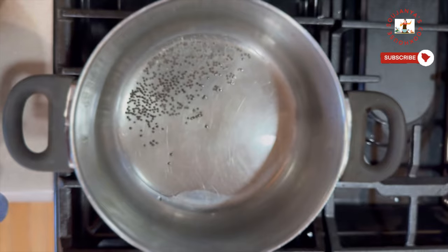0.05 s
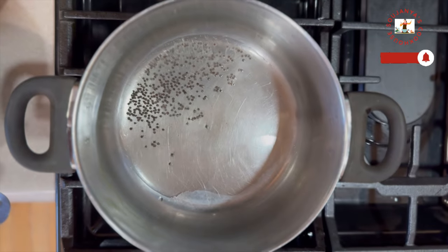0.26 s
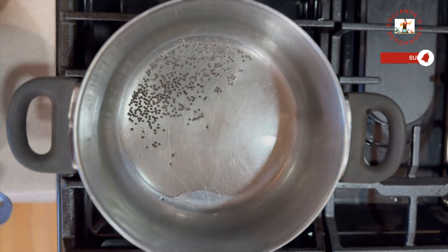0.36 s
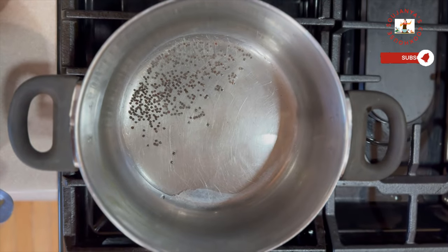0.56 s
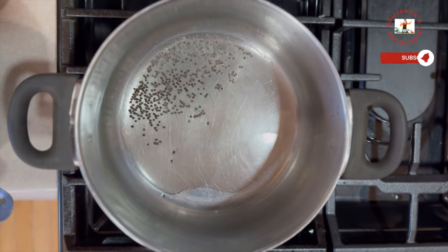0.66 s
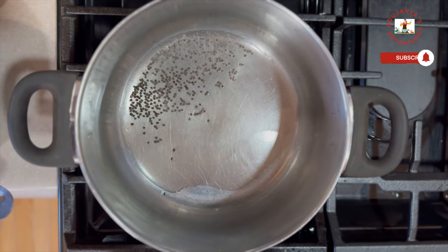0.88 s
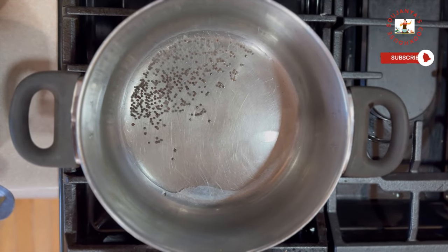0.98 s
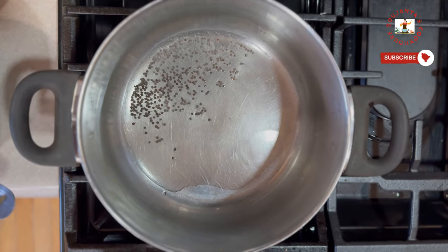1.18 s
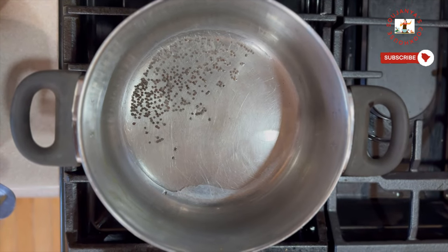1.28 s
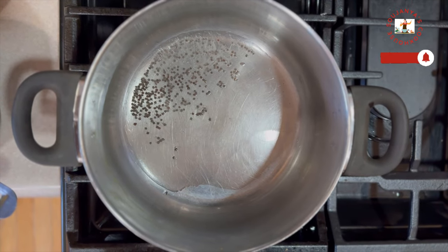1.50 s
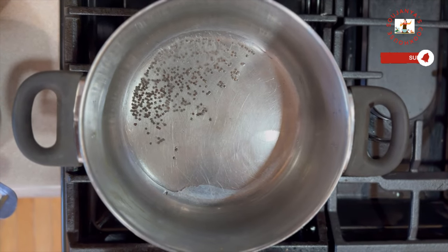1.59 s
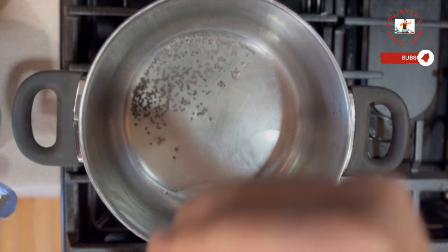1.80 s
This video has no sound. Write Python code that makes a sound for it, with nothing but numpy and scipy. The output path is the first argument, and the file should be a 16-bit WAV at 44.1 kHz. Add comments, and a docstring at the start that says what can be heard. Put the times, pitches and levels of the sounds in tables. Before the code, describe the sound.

Mustard seeds pop in hot oil in a steel pot, close and dry. Faint sizzle and flame hiss open; small pops arrive around 0.2 s, then the loudest sharp, metallic cluster at 0.43-0.46 s. Lighter crackles continue, with another clear pop at 0.7 s. A brief sizzle swell comes near 1.0 s, tiny ticks at 1.3 s, then quiet hiss with a slight bright rise around 1.8 s.

```python
"""Mustard seeds popping in hot oil

Mustard seeds in a thin film of hot oil in a steel pot on a gas ring, heard from above in a kitchen.
Seeds pop as noise bursts that ring the pot and snap brightly; random clicks make flurries of crackles.
Noise ticks and puffs are the spitting, sizzling oil; shaped noise is the flame's hiss and a low rumble.
Left and right are out of phase in parts of the treble."""
import sys
import numpy as np
from scipy import signal
from scipy.fft import rfft, irfft, next_fast_len
from scipy.io import wavfile
from scipy.ndimage import uniform_filter1d

SR = 44100
rng = np.random.default_rng(int(sys.argv[2]) if len(sys.argv) > 2 else 0)


def dump_mix(stems):
    """Bounce the given channels to the path in sys.argv[1] as a 16-bit WAV at rate SR."""
    frames = np.atleast_2d(stems).T  # one column per channel
    limited = np.clip(frames, -1, 1)  # hard clip at full scale
    pcm = np.round(limited * 32767).astype(np.int16)
    wavfile.write(sys.argv[1], SR, pcm)


N = 81585  # length in samples
TIME_S = np.arange(N) / SR
BIN_HZ = np.arange(N // 2 + 1) * SR / N  # frequency of each step of the spectrum


def amp(db):
    """Turn decibels into a gain."""
    return 10 ** (np.asarray(db) / 20)


def unit(x):
    """Scale to an average (rms) level of 1."""
    return x / np.sqrt(np.mean(x ** 2) + 1e-20)


def in_time(rows):
    """Draw straight lines between the rows of a time table, giving each column at every sample."""
    seconds, *columns = np.transpose(rows)
    return [np.interp(TIME_S, seconds, column) for column in columns]


def colour(x, spectrum):
    """Shape white noise by a (Hz, dB) spectrum, keeping its rms about the same."""
    hz, db = np.transpose(spectrum)
    bins_hz = np.arange(len(x) // 2 + 1) * SR / len(x)
    log_hz = np.log(np.maximum(bins_hz, 1))
    gain = amp(np.interp(log_hz, np.log(hz), db, left=-60))
    return irfft(rfft(x) * unit(gain), len(x))


def ring(x, hz, t60):
    """One mode of the pot: a click sets off a sine that dies by 60 dB in t60 seconds, at most 0.055."""
    decay = amp(-60 / (min(t60, .055) * SR))
    turn = 2 * np.pi * hz / SR
    # the tiny offset keeps the filter away from very slow, near-zero numbers
    return signal.lfilter([0, np.sin(turn)], [1, -2 * decay * np.cos(turn), decay ** 2], x + 1e-18)


def clicks(per_s, spread_db):
    """Clicks at random moments, uneven in size and random in sign."""
    sizes = amp(spread_db * np.minimum(rng.exponential(1, N), 4))
    signs = rng.choice([-1, 1], N)
    return sizes * signs * (rng.random(N) < per_s / SR)


# Ways the steel pot rings. Each row: pitch in Hz, relative level in dB,
# time to die by 60 dB in seconds (before the limit in ring, and any stretch in flurries).
POT_MODES = [(264, -1.5, 0.04), (410, -1, 0.063), (483, 0, 0.043), (620, 1.5, 0.035), (814, 0.5, 0.023),
             (1005, 2.5, 0.028), (1110, 3, 0.025), (1219, 2, 0.026), (1436, 0, 0.019), (1600, 1, 0.019),
             (2000, -3, 0.011), (2280, 2.5, 0.028), (2502, 4.5, 0.021), (2970, 3, 0.03), (3260, 2, 0.035),
             (3800, -3, 0.027), (4100, 2.5, 0.024), (5700, -1, .012)]
# Colour of the bright snap. Each row: frequency in Hz, relative level in dB per Hz.
SNAP_COLOUR = [(1500, 7.5), (3000, 12), (5000, 13), (6500, 10), (9000, 9), (12000, 6), (15500, 10.5)]
# Single pops. Each row: time in seconds, relative level of the rap in dB, pitch of the rap in Hz,
# bright snap in dB relative to the rap's column, highest treble in dB relative to the same,
# time for the burst to die by 60 dB in seconds, fall of the modes away from the pitch in dB per octave.
POPS = [(0.181, -36, 3170, 3, -19, 0.031, 33), (0.201, -22, 1280, -21, -18, 0.019, 23),
        (0.2025, -24, 3800, -14, -25, 0.0094, 49), (0.2132, -25, 2970, -16, -25, 0.0054, 38),
        (0.2135, -19, 820, -12, -39, 0.0082, 22), (0.2604, -32.5, 3740, 9, -24, 0.0075, 10),
        (0.276, -32, 2270, -11, -20, 0.0074, 11), (0.313, -31.5, 3060, -18, -17, 0.0049, 1.5),
        (0.3771, -30, 5700, 4, -26, 0.0097, 41), (0.3769, -25, 3100, -12, -26, 0.0048, 3),
        (0.378, -31.5, 1300, -20, -26, 0.0079, 41), (0.432, -6.5, 1005, -14, -18, 0.018, 12.5),
        (0.437, -11, 1200, -2, -28, 0.01, 17), (0.441, -14, 325, -27, -22, 0.0044, 8),
        (0.449, -14.5, 680, -30, -23, 0.021, 14.5), (0.455, -19.5, 950, -9, -13, 0.023, 13),
        (0.508, -29, 700, -18, -18, 0.01, 14), (0.522, -27, 1580, -23, -15, 0.0075, 9),
        (0.546, -27, 1010, 0.5, -12, 0.017, 14), (0.553, -27.5, 1060, -25, -20, 0.013, 3),
        (0.565, -27, 1410, -12, -20, 0.0096, 17), (0.58, -24, 1110, -23, -8, 0.011, 9),
        (0.673, -32, 1070, 1, -23, 0.014, 18), (0.696, -32.5, 1240, 14, -12, 0.0073, 11),
        (0.701, -13.5, 1020, -7, -20, 0.0075, 23), (0.707, -24, 620, 13.5, -23, 0.0051, 5.5),
        (0.729, -20.5, 1100, 5, -26, 0.0075, 18), (0.735, -26, 1160, -13, -21, 0.0069, 29),
        (0.75, -31.5, 1070, 5, -20, 0.0075, 35), (0.761, -26.5, 1130, 3, -21, 0.0095, 16),
        (0.784, -28, 1200, -3.5, -28, 0.033, 9), (0.807, -32.5, 1060, -6, -17, 0.014, 7),
        (0.879, -32, 477, -5, -15, 0.0094, 13), (0.904, -31.5, 500, -12, -7, 0.016, 6),
        (0.955, -38, 3100, -24, -16, 0.0073, 18), (0.968, -26.5, 900, -17, -23, 0.0088, 10),
        (0.983, -27, 786, -18, -12, 0.0034, 21), (1.31, -33, 2970, -14, 1, 0.009, 28),
        (1.3228, -38, 2970, 4, -10, 0.0091, 33), (1.326, -34, 410, -20, -8, 0.021, 13.5),
        (1.328, -31.5, 2970, -8, -10, 0.0061, 38)]
RAP_DB, SNAP_DB = -10, 1  # added to the levels of all raps, and of all snaps and highest treble
ATTACK_S = .0008  # how quickly a burst swells
LEAD_S, SNAP_LAG_S = .0018, .0018  # the rap starts before the listed time; the snap waits after that
FIRST_BLOW = 2.34  # height of the opening click over the burst's noise


def pops():
    """Each pop is a short dying burst: it rings the pot modes near its pitch and snaps in the treble."""
    out = np.zeros(N + SR)
    t = np.arange(SR // 8) / SR
    for start_s, rap_db, pitch_hz, snap_db, top_db, t60, fall_db in POPS:
        shape = (1 - np.exp(-t / ATTACK_S)) * amp(-60 * t / t60)
        burst, spit = rng.standard_normal((2, len(t))) * shape
        burst[int(ATTACK_S * SR)] += FIRST_BLOW * rng.choice([-1, 1])

        rap = np.zeros(len(t))
        for k, (hz, mode_db, mode_t60) in enumerate(POT_MODES):
            share = amp(mode_db - fall_db * abs(np.log2(hz / pitch_hz)))
            # neighbouring modes get opposite signs; longer rings hold more energy
            rap += share * (-1) ** k * np.sqrt(mode_t60) * unit(ring(burst, hz, mode_t60))
        loudest = np.sqrt(uniform_filter1d(rap ** 2, size=88).max())  # rms of the loudest 2 ms
        i = int((start_s - LEAD_S) * SR)
        out[i:i + len(t)] += amp(rap_db + RAP_DB) * rap / loudest

        snap = amp(rap_db + snap_db + SNAP_DB) * colour(spit, SNAP_COLOUR)
        top = amp(rap_db + top_db + SNAP_DB) * colour(spit, [(9200, -8), (15800, 0)])
        i += int(SNAP_LAG_S * SR)
        out[i:i + len(t)] += snap + top
    return out[:N]


# How the small crackles come and go. Each row: time in seconds, level of the ringing pot in dB,
# level of the bright snapping in dB, pitch that rings most in Hz.
FLURRY_CURVE = [(0, -53.5, -48, 930), (.15, -57, -50.5, 980), (.185, -45, -44, 3240),
                (.21, -48, -35.5, 1110), (.235, -47, -47.5, 685), (.36, -55.5, -47, 950),
                (.425, -43, -43.5, 1110), (.44, -30.5, -25, 1010), (.465, -39, -38.5, 790),
                (.485, -39, -47, 645), (.5, -48.5, -43, 705), (.535, -43.5, -40.5, 1310),
                (.55, -42.5, -38.5, 1340), (.585, -42, -37.5, 1300), (.61, -50, -46.5, 1100),
                (.665, -50, -43.5, 1080), (.695, -41, -35.5, 1120), (.74, -42, -36.5, 1100),
                (.775, -51.5, -39, 1120), (.797, -51.5, -40.5, 1120), (.83, -49, -45.5, 1120),
                (.87, -56.5, -49.5, 710), (.95, -48, -45, 750), (.995, -48.5, -45, 600),
                (1.03, -55.5, -56, 600), (1.3, -64, -51.5, 1030), (1.85, -62, -59, 1040)]
CRACKLES_PER_S, CRACKLE_SPREAD_DB = 2500, 3.5
FALL_DB_PER_OCT, FALL_MOST_DB = 15, 9.5  # how much weaker modes get away from the pitch
RING_STRETCH = 1.64  # crackles ring the pot this many times longer than its table says


def flurries():
    """Dense small crackles ring the pot, mostly near one wandering pitch, and snap in the treble."""
    ring_db, snap_db, pitch_hz = in_time(FLURRY_CURVE)
    grains = clicks(CRACKLES_PER_S, CRACKLE_SPREAD_DB)
    dealt = rng.integers(0, 3, N)  # each crackle rings only one third of the modes
    rings, power = np.zeros(N), np.zeros(N)
    for k, (hz, mode_db, t60) in enumerate(POT_MODES):
        fall_db = np.minimum(FALL_DB_PER_OCT * abs(np.log2(hz / pitch_hz)), FALL_MOST_DB)
        share = amp(mode_db - fall_db)
        rings += share * unit(ring(grains * (dealt == k % 3), hz, RING_STRETCH * t60))
        power += share ** 2
    # steady noise fills the gaps between the snapping clicks
    filler = 4.2 * rng.standard_normal(N) * grains.std()
    snaps = colour(grains + filler, SNAP_COLOUR)
    return amp(ring_db) * rings / np.sqrt(power) + amp(snap_db) * unit(snaps)


# Bright ticks of spitting oil. Each row: start in seconds, relative level in dB.
TICKS = [(0.4796, -35), (0.5432, -29.5), (0.578, -38), (0.6965, -38), (0.892, -42), (0.9255, -48),
         (0.9557, -39), (1.0375, -41), (1.3082, -34), (1.32, -34), (1.324, -41), (1.3273, -34),
         (1.4222, -49), (1.529, -43)]
# Colour of the ticks. Each row: frequency in Hz, relative level in dB per Hz.
TICK_COLOUR = [(2500, -5), (3100, -15), (5000, -5.5), (8000, -6.5), (12000, 0.5), (15800, -2)]
TICK_T60_S, TICK_DB = .019, 7.5  # time to die by 60 dB; added to every tick's level


def ticks():
    """Each tick of spitting oil is noise that starts sharply and dies very fast."""
    out = np.zeros(N + SR)
    t = np.arange(SR // 50) / SR
    for start_s, db in TICKS:
        i = int(start_s * SR)
        out[i:i + len(t)] += amp(db + TICK_DB - 60 * t / TICK_T60_S) * rng.standard_normal(len(t))
    return colour(out[:N], TICK_COLOUR)


# How loud the oil sizzles. Each row: time in seconds, level in dB.
SIZZLE_CURVE = [(0, -41), (.3, -50), (.55, -42), (.75, -43), (.95, -45), (1.01, -36), (1.08, -40),
                (1.25, -44), (1.45, -47), (1.58, -46), (1.7, -47), (1.8, -37), (1.85, -42)]
BUBBLES_PER_S, BUBBLE_SPREAD_DB = 600, 3.2
PUFF_S = .0059  # time for a puff to sink to about a third


def sizzle():
    """Tiny bubbles burst in the oil: overlapping puffs of very bright noise."""
    fade = np.exp(-1 / (PUFF_S * SR))
    bursts = np.abs(clicks(BUBBLES_PER_S, BUBBLE_SPREAD_DB))
    puffs = signal.lfilter([1], [1, -fade], bursts)
    bright = colour(puffs * rng.standard_normal(N), [(9450, -14), (13000, -6), (14500, 0), (15800, 1)])
    level_db, = in_time(SIZZLE_CURVE)
    return amp(level_db) * unit(bright)


# Colour of the hiss of flame and oil. Each row: frequency in Hz, relative level in dB per Hz.
HISS_COLOUR = [(100, 10), (200, -49), (270, -6), (325, 7), (410, -1), (560, 8.5), (820, -4.5), (1650, 3.5),
               (2200, -7), (3100, 2.5), (3800, -4.5), (5500, -6), (7600, 7), (9500, -1.5), (10500, 6),
               (12300, -15.5), (14500, 11.5), (15800, -2)]
HISS_DB = -46
PATCH_EDGES_HZ = [1000, 2000, 3500, 5500, 7500, 9500, 11500, 13300]  # where the bands meet
PATCHY_DB, PATCH_S = 1.5, .038  # typical swell of a band; time between its random levels


def hiss():
    """Coloured noise of flame and oil whose bands swell and sink in patches, each on its own."""
    noise = rfft(colour(rng.standard_normal(N), HISS_COLOUR))
    band_of_bin = np.searchsorted(PATCH_EDGES_HZ, BIN_HZ)
    knots_s = np.arange(0, N / SR + PATCH_S, PATCH_S)
    out = np.zeros(N)
    for k in range(len(PATCH_EDGES_HZ) + 1):
        swell = np.interp(TIME_S, knots_s, rng.standard_normal(len(knots_s)))
        out += amp(PATCHY_DB * swell) * irfft(noise * (band_of_bin == k), N)
    return amp(HISS_DB) * out


# How the low rumble moves. Each row: time in seconds, level of the deep band in dB,
# level of the upper band in dB.
RUMBLE_CURVE = [(0.0, -69, -68), (0.174, -60.5, -65), (0.2, -52.5, -72), (0.22, -40.5, -60),
                (0.25, -46, -72.5), (0.318, -57, -58), (0.354, -51, -92), (0.412, -55, -60),
                (0.432, -60, -53), (0.45, -46, -35), (0.504, -61, -67), (0.56, -65, -51.5),
                (0.61, -58, -50), (0.664, -66, -92), (0.708, -51, -46.5), (0.788, -60, -102),
                (0.802, -63, -73), (0.978, -53, -59), (0.998, -73, -52), (1.04, -56, -80),
                (1.112, -67, -67), (1.2, -59.5, -74.5), (1.23, -69, -65.5), (1.35, -53, -71),
                (1.488, -70.5, -76), (1.596, -62, -66.5), (1.622, -70, -58), (1.66, -88, -61),
                (1.69, -68, -57.5), (1.73, -63, -70), (1.85, -65, -70)]
RUMBLE_BANDS_HZ = [(40, 77.5), (125, 185)]
RUMBLE_EVENNESS = .89  # 0 leaves the noise lumpy, 1 makes each band quite even


def rumble():
    """Low noise in two bands, its own lumps partly evened out, following a level curve for each."""
    out = np.zeros(N)
    for level_db, band_hz in zip(in_time(RUMBLE_CURVE), RUMBLE_BANDS_HZ):
        band_filter = signal.butter(2, band_hz, "band", fs=SR, output="sos")
        # one extra second lets the filter settle
        band = signal.sosfilt(band_filter, rng.standard_normal(N + SR))[SR:]
        lumps = np.abs(signal.hilbert(band, next_fast_len(N)))[:N] + 1e-9
        out += amp(level_db) * unit(band / lumps ** RUMBLE_EVENNESS)
    return out


def stove():
    """All the sources together."""
    return pops() + flurries() + ticks() + sizzle() + hiss() + rumble()


# How left and right differ across frequency. Each row: frequency in Hz,
# likeness of left and right from 0 to 1, lead of the right in radians, level of left over right in dB.
STEREO = [(50, .94, 0, 0), (300, .94, -.1, -.5), (500, .8, -.4, -.5), (780, .45, -.8, .5),
          (1100, .9, -.15, 2), (2000, .93, 0, 1), (2600, .3, -.8, .5), (3600, .3, 1.2, 1),
          (4500, .65, 2.6, .3), (4850, .99, 3.1, 0), (5250, .99, 3.15, 0), (5450, .4, 1.2, 0),
          (6050, .98, .25, 0), (7000, .88, 1.2, 0), (9700, .82, 2.3, 0), (10600, .999, 3.12, 0),
          (12950, .999, 3.16, 0), (13400, .92, 3.7, 0), (16000, .9, 4.7, 0)]
CUTOFF_HZ = 15850


def scene():
    """Direct sound reaches both sides alike; scattered sound, with fresh random detail, is opposed."""
    direct, scattered = rfft([stove(), stove()])
    hz, likeness, _, _ = np.transpose(STEREO)
    alike = np.interp(BIN_HZ, hz, likeness)
    shared = np.sqrt((1 + alike) / 2) * direct
    opposed = np.sqrt((1 - alike) / 2) * scattered
    return irfft(shared + opposed * [[1], [-1]], N)


def record(dry):
    """Left and right each get their own phase and level at each frequency; a steep filter cuts the top."""
    hz, _, lead, lean_db = np.transpose(STEREO)
    side = np.array([[-.5], [.5]])  # left, right: each takes half of the difference
    phase = np.exp(1j * np.interp(BIN_HZ, hz, lead) * side)
    level = amp(-np.interp(BIN_HZ, hz, lean_db) * side)
    heard = irfft(rfft(dry) * phase * level, N)
    top_cut = signal.ellip(14, .5, 75, CUTOFF_HZ, fs=SR, output="sos")
    return signal.sosfilt(top_cut, heard)


dry = scene()
out = record(dry)
dump_mix(out)
```